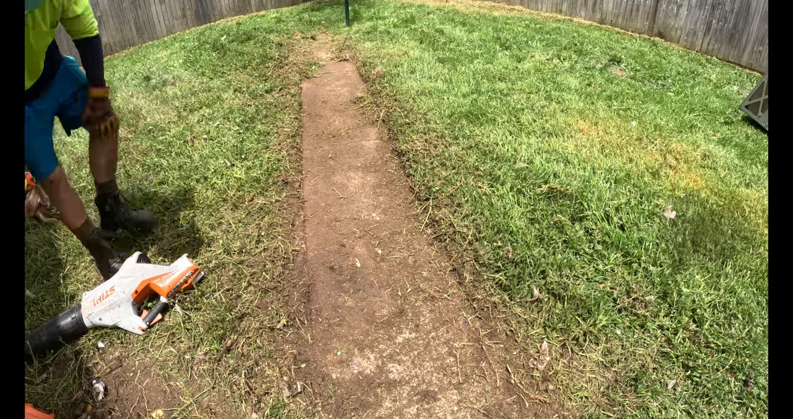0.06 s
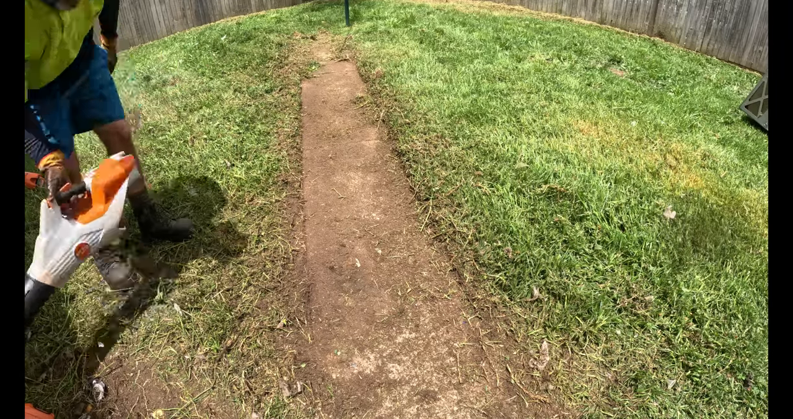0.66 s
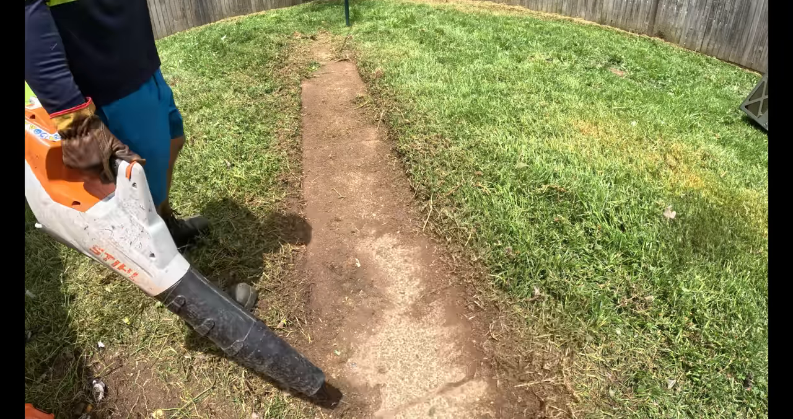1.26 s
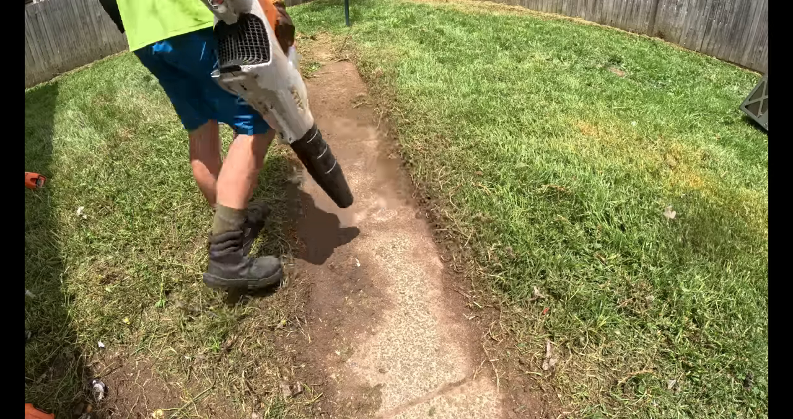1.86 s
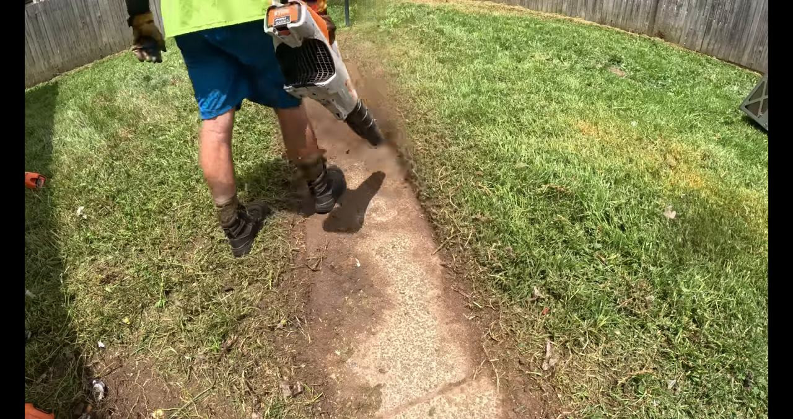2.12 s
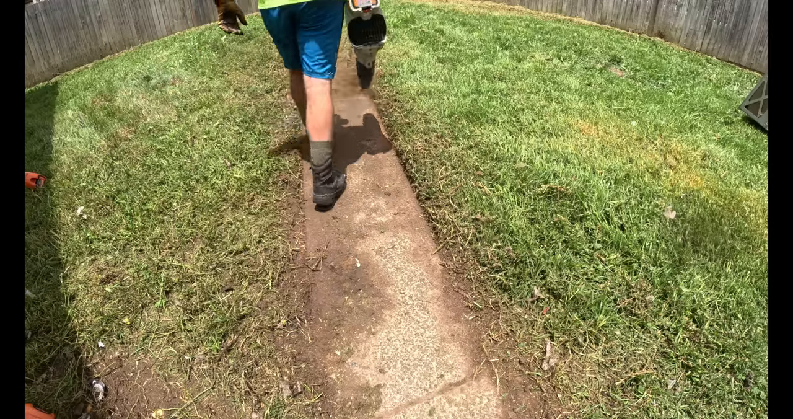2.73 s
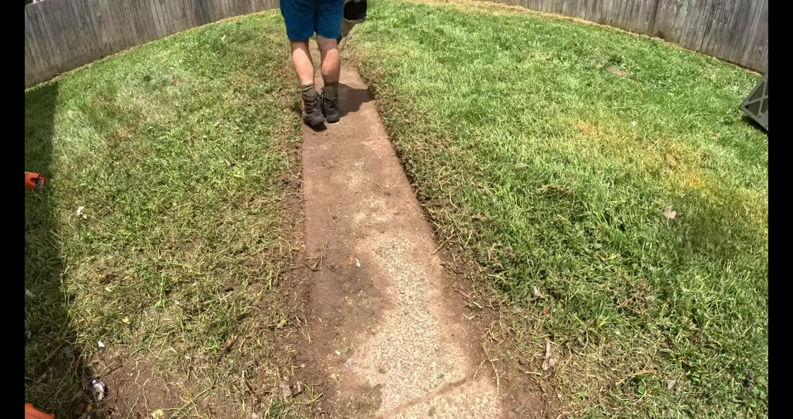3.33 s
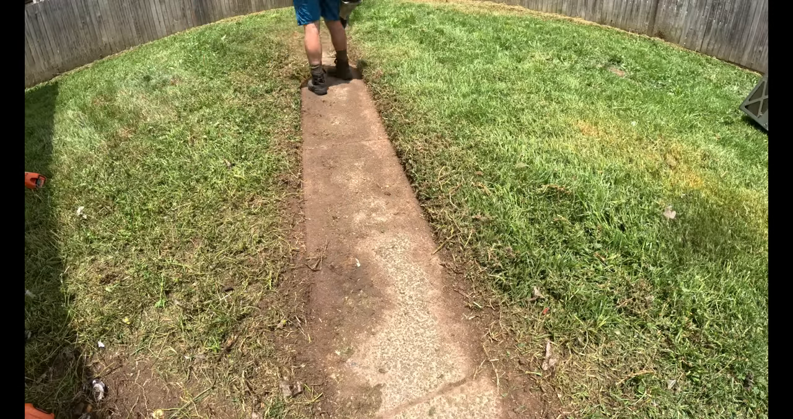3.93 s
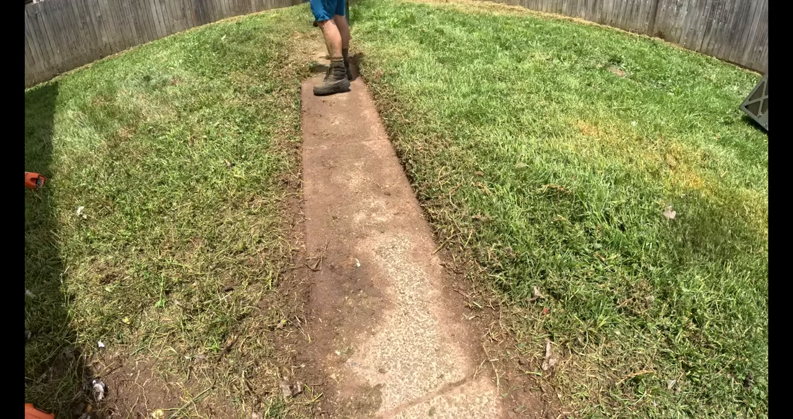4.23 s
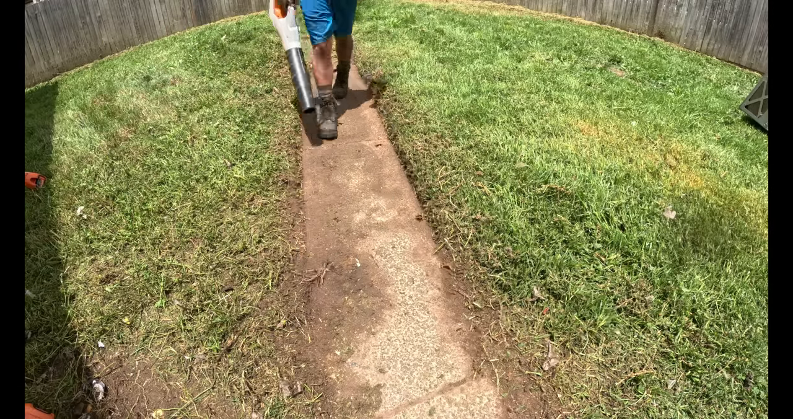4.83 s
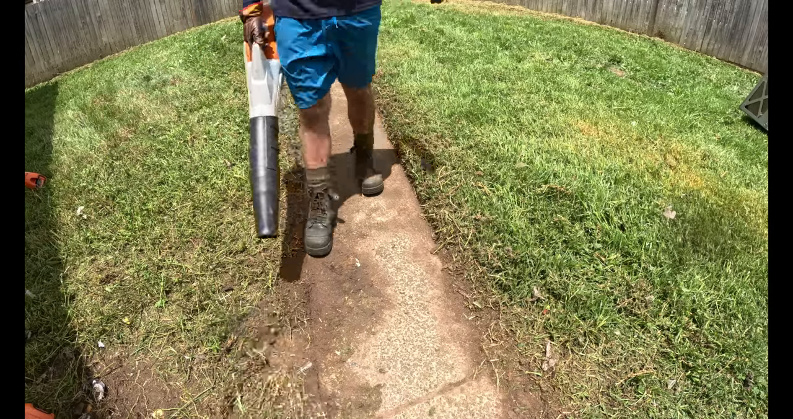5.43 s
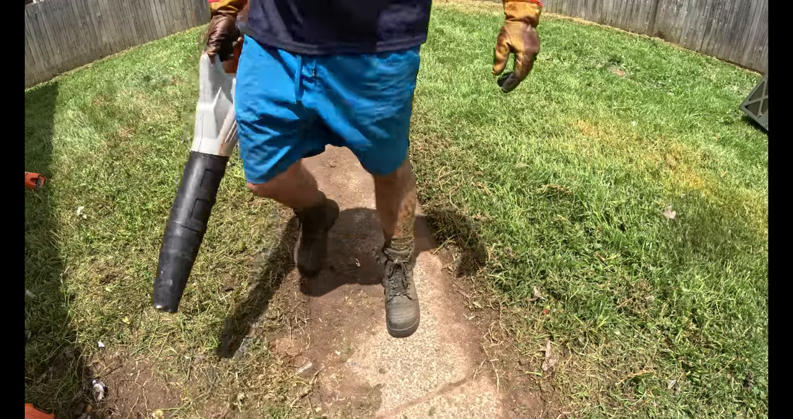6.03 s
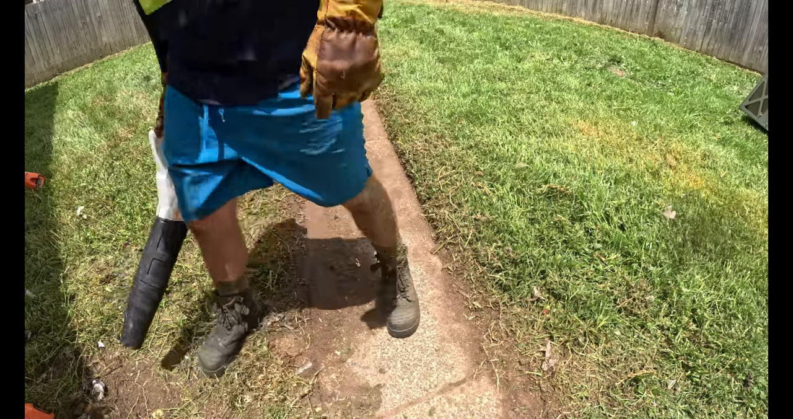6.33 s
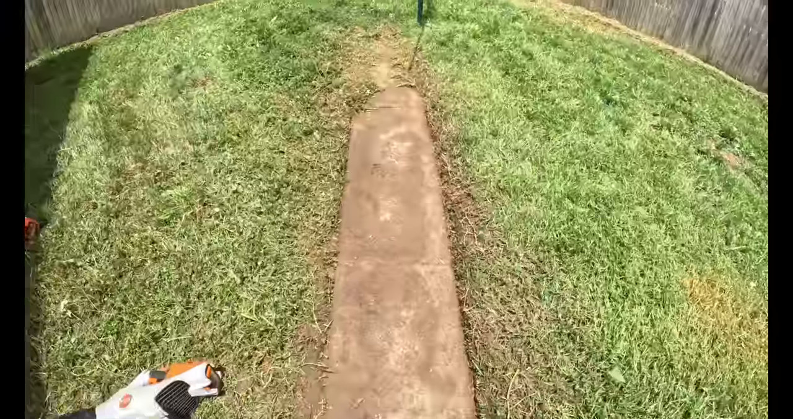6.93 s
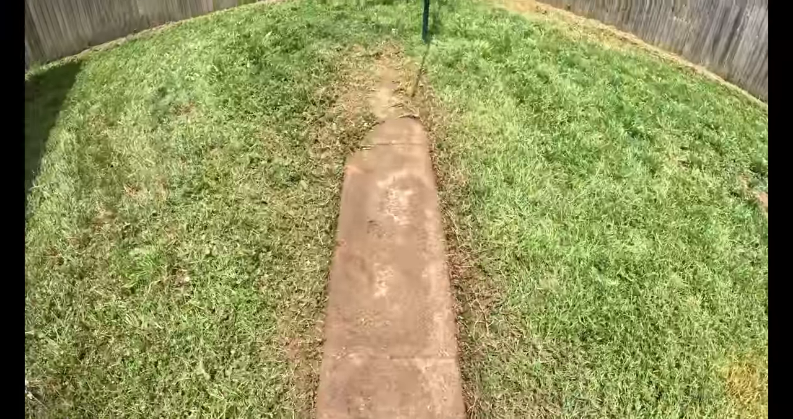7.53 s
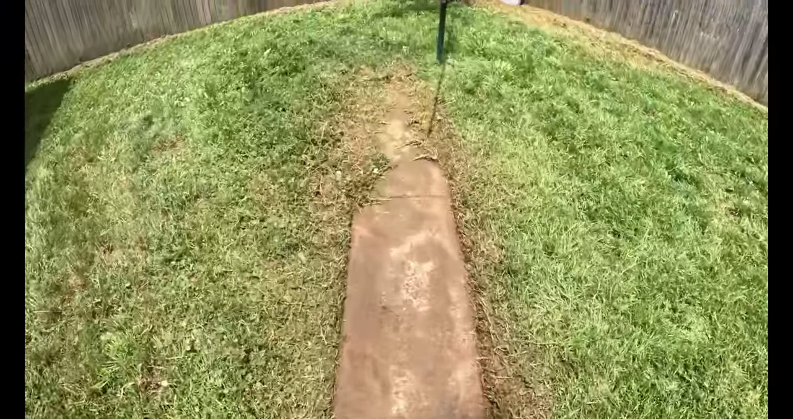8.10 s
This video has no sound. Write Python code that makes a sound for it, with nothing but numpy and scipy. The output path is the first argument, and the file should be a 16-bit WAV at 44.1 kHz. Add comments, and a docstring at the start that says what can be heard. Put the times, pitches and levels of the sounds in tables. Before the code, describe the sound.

A cordless leaf blower runs outdoors in two blasts, a high whine over rushing air, then winds down.

```python
"""Clothes and grass rustle as a cordless leaf blower is picked off a lawn; it is then run in two blasts
along a concrete path and put down. Its twelve-bladed fan whines at the blade-passing frequency over the
rush of a turbulent jet and a hoarse band of tip vortices, with fences reflecting it from all round.
Gusts thump the microphone, and in the quiet afterwards a far bird calls three times."""
import sys
import numpy as np
from scipy import signal
from scipy.io import wavfile
from scipy.ndimage import uniform_filter1d

SR = 44100
rng = np.random.default_rng(int(sys.argv[2]) if len(sys.argv) > 2 else 0)


def file_out(sig):
    """Save sig as 16-bit WAV at sys.argv[1]."""
    # one column per channel
    cols = np.atleast_2d(sig).T
    # limit, then scale
    lim = np.clip(cols, -1, 1)
    pcm = np.round(lim * 32767).astype(np.int16)
    wavfile.write(sys.argv[1], SR, pcm)


N = 359894
TIME = np.arange(N) / SR
SIDES = np.array([[.5], [-.5]])   # splits a difference between left and right

# blasts: (trigger pulled [s], run-up ends [s], speed by then [turns/s], trigger released [s])
BLASTS = [(.92, 1.147, 288, 4.231), (4.412, 4.632, 303.5, 6.366)]
TOP_TURNS_PER_S, SETTLE_S = 326.8, .385
KICK_TURNS_PER_S, KICK_S = 95, .015   # the jolt that starts the fan
BRAKE_S, FRICTION_TURNS_PER_S = .15, 40

# base levels at full speed; each GROWTH is in dB per tenfold speed
WHINE_DB, OCTAVE_DB, WHINE_GROWTH_DB, OCTAVE_GROWTH_DB = -31, -42, 44, 68.5
TOP_DB, HUM_DB, STRUT_DB, HUM_GROWTH_DB = -59, -49, -33, 57
HOWL_DB, HOWL_GROWTH_DB, VORTEX_DB, VORTEX_GROWTH_DB = -31.5, 57, -31, 59
JET_DB, RUSH_GROWTH_DB, ROAR_GROWTH_DB, THROAT_GROWTH_DB = -22, 43.5, 39.5, 29
STALL_WHINE_DB, STALL_JET_DB, STALL_ROAR_DB = -11, -1.5, -1.5   # changes at full stall
HOARSE_DB, WHINE_FLUTTER_DB, VORTEX_SWAY_DB = 4, .6, 1.5

# the whine beams, so it comes and goes as the blower swings: (time [s], level [dB])
WHINE_LOBES = [(0.98, -6), (1.03, 1.5), (1.1, -1), (1.16, -2.0), (1.28, 1.5), (1.34, -0.5), (1.42, 3.5),
               (1.44, -2.0), (1.5, 3.0), (1.54, -2.0), (1.64, 1.5), (1.68, -4.0), (1.72, 4.5), (1.92, 1.5),
               (1.96, -6.5), (2.1, -5.0), (2.2, 1.0), (2.26, -4.0), (2.42, 0.5), (2.48, -6.5), (2.52, -0.5),
               (2.56, -10.0), (2.7, -3.0), (2.82, -3.5), (2.98, 2.5), (3.06, -6.5), (3.22, -1.0),
               (3.24, -8.0), (3.3, -1.5), (3.46, 0.0), (3.5, -3.5), (3.56, 1.5), (3.72, -7.5), (3.78, 0.0),
               (3.9, -4.0), (3.92, 0.0), (3.96, -7.0), (4.12, -2.0), (4.22, -7.5), (4.45, -12), (4.58, -3),
               (4.64, -0.5), (4.7, 4.5), (4.84, -1.5), (4.88, 2.5), (4.96, -3.5), (5.06, 6.0), (5.16, -3.0),
               (5.26, -0.5), (5.32, 4.0), (5.42, -6.0), (5.46, 5.5), (5.5, 7.0), (5.64, 4.5), (5.68, -6.0),
               (5.78, 4.0), (5.82, 0.5), (5.88, 4.0), (5.96, -6.0), (6.0, 0.0), (6.04, -5.0), (6.06, 1.0),
               (6.12, -4.0), (6.24, 2.0), (6.36, -1.0)]
# its side of arrival flips from lobe to lobe: (time [s], left phase lead [rad])
WHINE_PHASE = [(1.1, -2), (1.4, -3), (1.47, -2), (1.53, -2), (1.58, -1.5), (1.96, -6), (2.04, -1),
               (2.24, -1.2), (2.28, -6), (2.62, -1), (2.68, -1.8), (2.8, -1.5), (2.94, -2), (3.2, -1.2),
               (3.45, -2.5), (3.7, -2.5), (3.74, -0.2), (3.95, 1.6), (4.2, 1.5), (4.83, 0.7), (4.98, -1.84),
               (5.4, -2), (5.44, -1.5), (6.1, -1.5), (6.18, -5), (6.35, -1.5)]
# its octave beams in narrower lobes: (time [s], level [dB], left phase lead [rad])
OCTAVE_LOBES = [(1.08, -4, 2.5), (1.3, 8, 1), (1.42, 5, 4), (1.65, -0.5, 3), (1.92, -1.5, 1.5),
                (2.1, -4, 2), (2.33, 1.5, 1.2), (2.6, -4, 1.5), (2.7, -5.5, 4.5), (2.82, -1.5, 6.5),
                (3.1, -4, 4), (3.22, -13, -2.5), (3.32, 5, -2), (3.58, 0, -1.8), (4.2, -2.5, -2),
                (4.6, -6, -1), (4.8, 8, 3), (4.97, -0.5, 1.5), (5.05, 5.5, -6), (5.38, 5, 1),
                (5.51, 0.5, -0.5), (5.6, -2, 3.5), (5.8, -0.5, 2), (6.0, -3.5, -3), (6.35, -2.5, 0.6)]
OCTAVE_PAN_DB = 2.5   # further left than the air
# thin top of the whine: (frequency [multiple of shaft rate], level [dB])
TOP_PARTIALS = [(36, 0), (37.7, -4.5)]
# once-a-turn hum, strongest with the housing side-on and near: (time [s], level [dB])
HUM_LEVELS = [(1.15, 12), (1.4, 14.5), (1.55, 15.5), (1.67, 13.5), (1.76, -7.5), (2.2, 0), (2.45, -11),
              (2.95, -6.5), (3.08, 7), (3.3, -7), (3.75, -8), (5.05, -13.5), (5.24, 10), (5.45, -1.5),
              (5.7, 7), (6.2, -6), (6.35, 9.5)]
# four-a-turn tone of the struts: (time [s], level [dB])
STRUT_LEVELS = [(1.4, -11), (1.51, 5.5), (1.62, -4), (1.77, -3), (1.86, -4), (2.03, 2.5), (2.15, -3.5),
                (2.45, -5), (3.08, -9), (3.19, -3), (3.5, -1.5), (3.6, -9.5), (3.87, -6), (4.0, 0),
                (4.2, -23), (4.6, -16), (5.05, -6.5), (5.2, -10.5), (5.62, -0.5), (5.85, -7), (6.0, -4.5),
                (6.12, -6.5), (6.24, -4.5), (6.36, -12)]

# the strongest tip vortex locks in and lets go again: (time [s], level [dB])
HOWL_LEVELS = [(1.04, -6.0), (1.08, 9.5), (1.11, 13.0), (1.16, 7.5), (1.3, 5.0), (1.36, -8.0), (1.56, 2.0),
               (1.66, -6.0), (1.92, 5.0), (2.0, -10.5), (2.16, 2.0), (2.48, 0.0), (2.6, -13.0), (2.66, 2.0),
               (2.88, 0.5), (2.94, -7.5), (3.02, -1.5), (3.08, -9.0), (3.3, -3.5), (3.48, -13.0),
               (3.58, 2.5), (3.76, -5.5), (3.98, 0.0), (4.12, -6.0), (4.22, 2.5), (4.27, 3.0),
               (4.36, -10.0), (4.58, -5.0), (4.62, -12.0), (4.66, 5.0), (4.86, -8.0), (4.94, -1.5),
               (5.08, -9.0), (5.18, 2.5), (5.28, -5.5), (5.34, 4.5), (5.54, -4.5), (5.68, 2.5),
               (5.86, -10.5), (5.96, -2.0), (6.02, -9.5), (6.14, -3.0), (6.32, -14.5), (6.39, 9.5),
               (6.45, 1.0), (6.52, 11.0), (6.57, 0.0)]
HOWL_MULTIPLE, HOWL_WANDER_HZ, HOWL_FLUTTER_DB = 6.55, 36, 2
# tip vortex bands: (frequency [multiple of shaft rate], width [Hz], level [dB])
VORTEX_BANDS = [(6.4, 340, -3), (7.2, 97, -10), (3.77, 58, -12.5), (3.2, 54, -16.5), (2.58, 25, -23),
                (1.72, 46, -19.5)]
# strength of all these bands together: (time [s], level [dB])
VORTEX_LEVELS = [(1.15, 1), (1.23, 1), (1.53, 1.0), (1.87, 3.0), (1.99, -4.5), (2.19, 2.0), (2.53, 1.0),
                 (2.79, 1.5), (3.19, -1.5), (3.73, -0.5), (4.11, -1.5), (4.23, -4.5), (4.62, 3.0),
                 (4.78, -1.5), (5.0, -1.5), (5.08, -3.5), (5.2, -1.0), (5.5, -2.0), (6.38, -2.0)]
# tube resonances: (frequency [Hz], width [Hz], lift [dB], change of lift at full stall [dB])
TUBE_MODES = [(742, 42, 25, -19), (1700, 170, 0, 7)]

# the jet as the nozzle swings over the ground; roar, throat and hiss are relative to the rush:
# (time [s], rush [dB], low roar [dB], throat [dB], hiss [dB], whole blower's left minus right [dB])
JET_SWING = [(1.15, 1.5, -5, -4, -4.5, 2.8), (1.38, -.5, 3.5, -2, 0.5, 1.8), (1.6, 0.5, -1.5, -1.5, -3, 3),
             (1.8, 1.5, -5.5, -1, -3, 2.6), (1.96, -2, 3, -1.5, -2, 2), (2.35, 2.5, -7, -4, -4.5, 1),
             (2.57, -1.5, 1, -2, -5.5, 1.1), (2.8, 1, -6, -2.5, -4, .5), (3.08, -1, -4, -4, -5.5, 1.3),
             (3.4, -2, 3, 0.5, -3.5, 0.75), (3.75, -2.5, -1, -1, -2, 1.8), (4.2, -2, -1, -1, -4.5, 2.7),
             (4.38, -3, -2, -6.5, -6, 3.1), (4.66, -3.5, -3, -3, 1, 2.2), (5.0, 0, -5, -3, -2, 1.9),
             (5.35, 0, 3.5, -5, 0, 1.7), (5.87, 0, 4.5, -2.5, -0.5, 3.4), (5.97, 2.5, -6, -7, -3.5, 2.2),
             (6.13, -2, 4, -3.5, 1, 4.5), (6.35, 0.5, 1.5, -5.5, -2, 4.2)]
# jet spectrum: (frequency [Hz], relative density [dB])
JET_SPECTRUM = [(40, -24.5), (110, -0.5), (165, -1.5), (225, 0), (320, -2.5), (400, -1.5), (550, -1),
                (670, -5), (950, 1), (1600, 5), (2900, 0), (4100, -3), (4700, -3), (7600, -9), (9500, -17),
                (12400, -16)]
IDLE_TURNS_PER_S, IDLE_DULL_DB = 200, -7   # the treble dulls below this speed, this much at standstill
# carried away and back: (time [s], distance [m], housing reflection [ratio, negative if inverted])
WALK = [(.95, 1.0, .35), (1.5, 1.3, .15), (1.85, 1.47, -.2), (2.3, 1.9, -.25), (3.05, 2.45, -.25),
        (3.35, 3.1, -.15), (4.2, 4.1, 0), (4.6, 5.6, .25), (4.85, 7.1, 0), (5.35, 3.7, 0), (5.6, 3.7, 0),
        (5.92, 2.7, 0), (6.5, 2.6, 0)]
GROUND_LAG_MS_AT_1_M, GROUND_SHARE, HOUSING_LAG_MS, ECHO_TOP_HZ = 5.0, .2, .62, 4000

# a 1042 Hz tone swells while the fan is slow, as it starts and as it slows down: (time [s], level [dB], width
# [s])
SLOW_SPEED_CHIRPS = [(.89, -48.5, 0.0074), (.972, -34.5, 0.015), (1.025, -38, 0.018), (4.322, -45, 0.01),
                     (4.36, -56, 0.031), (4.455, -41, 0.016), (6.472, -39.5, 0.016), (6.52, -56, 0.021)]
# whistle of the drive as it starts and stops: (time [s], level [dB], width [s])
DRIVE_WHISTLES = [(.895, -69, 0.012), (.935, -55, 0.0065), (4.405, -76, 0.017), (6.556, -65, 0.02)]
DRIVE_HZ, SWITCHING_HZ, DRIVE_UNDERTONE_DB = 1042, 8080, -14

# brushing clothes and grass, and at 4.39 s the faint noisy tail of the first blast echoing in the pause:
# (time [s], level [dB], width [s])
RUSTLES_AND_TAIL = [(.02, -61.5, 0.069), (.215, -52.5, 0.037), (.29, -68, 0.049), (.37, -58, 0.039),
                    (.55, -74, 0.013), (.66, -47.5, 0.029), (.81, -56.5, 0.36), (4.39, -63.5, .05),
                    (6.635, -53, 0.029), (6.68, -65, 0.11), (7.06, -90, 0.04), (8.05, -67.5, 0.023),
                    (8.11, -54, 0.018)]
# their spectrum: (frequency [Hz], relative density [dB])
RUSTLE_SPECTRUM = [(60, -10), (150, -2), (250, -2.5), (450, -11), (600, -9), (850, -14.5), (1500, -7),
                   (3500, -15.5), (7000, -22), (8800, -34.5), (12500, -34)]
# scuffs, knocks, the motor's starting jolt, and at 6.895 s a faint click as the sound returns after
# the dropout: (time [s], level [dB], centre [Hz], decay [s])
TRANSIENTS = [(.133, -56.5, 2400, .02), (.208, -55, 1990, .012), (.25, -53.5, 5470, 0.048),
              (.338, -56, 5500, .018), (.652, -55, 2270, 0.0078), (.923, -51, 1880, 0.009),
              (.957, -34.5, 890, 0.13), (4.437, -48, 680, 0.017), (6.472, -36.5, 1965, 0.011),
              (6.895, -68.5, 788, 0.008), (7.159, -60.5, 1090, .0075), (7.461, -60, 600, 0.006),
              (7.483, -65, 2200, 0.0037), (7.496, -67, 2180, .004), (7.525, -66, 1000, .007),
              (7.579, -73, 2600, .007), (7.822, -70, 500, 0.0046), (7.863, -66, 450, .007),
              (7.963, -68, 600, .006), (8.01, -65, 2500, 0.008), (8.02, -64.5, 650, 0.18),
              (8.113, -48.5, 3550, 0.0055)]
# gusts and bumps on the microphone: (time [s], level [dB], centre [Hz], width [s])
THUMPS = [(.31, -41, 44.4, 0.0087), (.378, -45, 147, 0.0017), (1.14, -35, 50.7, 0.01),
          (1.3, -41, 49.6, 0.026), (1.5, -32.5, 52.7, 0.0047), (1.74, -40, 45, 0.015),
          (1.91, -44, 44.7, 0.021), (3.575, -24, 200.4, 0.01), (3.79, -40, 50, 0.017),
          (4.37, -46, 45, 0.019), (4.472, -38, 197, 0.0071), (4.502, -37, 207, 0.0127),
          (4.59, -34, 64.4, 0.0054), (6.26, -38, 176, 0.13), (7.17, -52.5, 169.3, 0.0078),
          (7.466, -43.5, 134, 0.0024), (7.535, -56.5, 165, 0.0054), (7.8, -55, 59.4, 0.057),
          (7.972, -38, 101, 0.0056)]
# breeze on the microphone, in its lulls: (time [s], level [dB])
BREEZE_LULLS = [(0.0, -64), (0.36, -69), (1.07, -65), (1.34, -56), (2.66, -72), (3.34, -65), (3.54, -54),
                (3.93, -53), (4.14, -63.5), (4.95, -63.5), (5.27, -53.5), (6.23, -51.5), (6.7, -71.5),
                (6.91, -65), (7.07, -66), (8.02, -58.5), (8.16, -55)]
BREEZE_LIFT_DB = 7.5   # its mean level above the lulls
# breeze spectrum: (frequency [Hz], relative density [dB])
BREEZE_SPECTRUM = [(25, 10.5), (55, 7), (110, -7), (230, -14.5), (400, -25.5), (1000, -41), (4000, -52)]

# far bird calls: (start [s], length [s], top pitch [Hz], level [dB])
BIRD_CALLS = [(6.95, .27, 1352, -76), (7.33, .3, 1372, -76), (7.62, .32, 1400, -71)]
# harmonics of a call: (harmonic [number], level [dB])
BIRD_HARMONICS = [(1, -7.5), (2, -7.5), (3, -8), (4, -17)]
BIRD_RASP = .013   # share by which the pitch trembles
# faint outdoor air: (frequency [Hz], relative density [dB])
AIR_SPECTRUM = [(100, 1), (600, -2.5), (900, -12), (1400, -5.5), (2500, -14.5), (5000, -17.5),
                (7500, -36.5), (13000, -48.5)]
AIR_DB = -76.5
DROPOUT_FROM_S, DROPOUT_TO_S, ROLL_OFF_HZ, CUTOFF_HZ = 6.7, 6.892, 13200, 15300


def fan(turns, speed):
    """Periodic forcing: twelve blades give the whine and overtones; imbalance and struts, lower tones."""
    effort, stall = decades(speed), stalled(speed)
    passes = 12 * turns
    whine_db = WHINE_DB + in_time(WHINE_LOBES)[0] + WHINE_GROWTH_DB * effort + STALL_WHINE_DB * stall
    whine_db += WHINE_FLUTTER_DB * drift(19)
    hoarse = from_db(HOARSE_DB) * stall * tone(passes, scatter=5, fade_hz=170)
    clear = tone(passes, scatter=.2, fade_hz=22, lead=in_time(WHINE_PHASE)[0])
    whine = from_db(whine_db) * (clear + hoarse)
    octave_db, octave_lead = in_time(OCTAVE_LOBES)
    octave_gain = from_db(OCTAVE_DB + octave_db + OCTAVE_PAN_DB * SIDES)
    overtones = octave_gain * tone(2 * passes, scatter=.38, fade_hz=28, lead=octave_lead)
    for multiple, db in TOP_PARTIALS:
        overtones += from_db(TOP_DB + db) * tone(multiple * turns, scatter=1.4, fade_hz=50)
    hum = from_db(HUM_DB + in_time(HUM_LEVELS)[0]) * tone(turns, scatter=.5, fade_hz=12, lead=1.0)
    strut_gain = from_db(STRUT_DB + in_time(STRUT_LEVELS)[0])
    struts = strut_gain * tone(4 * turns, scatter=.55, fade_hz=7.8, lead=2.1)
    low_tones = from_db(HUM_GROWTH_DB * effort) * (hum + struts)
    return whine + from_db(OCTAVE_GROWTH_DB * effort) * overtones + low_tones


def shaft_speed():
    """Rotor inertia, in turns/s: a kick, a steady run-up, a creep to top speed, braking on release."""
    speed = np.zeros(N)
    for pulled, run_up_ends, reached, released in BLASTS:
        since = np.maximum(TIME - pulled, 0)
        kick = KICK_TURNS_PER_S * (1 - np.exp(-since / KICK_S))
        run_up = kick + (reached - KICK_TURNS_PER_S) * since / (run_up_ends - pulled)
        settling = np.exp(-np.maximum(TIME - run_up_ends, 0) / SETTLE_S)
        creep = TOP_TURNS_PER_S - (TOP_TURNS_PER_S - reached) * settling
        driven = np.where(TIME < run_up_ends, run_up, creep)
        brake = np.exp(-np.maximum(TIME - released, 0) / BRAKE_S)
        speed = np.maximum(speed, (driven + FRICTION_TURNS_PER_S) * brake - FRICTION_TURNS_PER_S)
    return speed


def turns_made(speed):
    """Phase is the integral of speed; while the blades stall, their pitch breaks up."""
    break_up = .06 * stalled(speed) * drift(250)
    return np.cumsum(speed * (1 + .0005 * drift(5.8) + break_up)) / SR


def stalled(speed):
    """Blade stall: 0 at steady speed, 1 under the hardest braking, a little in a fast run-up."""
    acceleration = np.gradient(speed) * SR
    stall = np.maximum(-acceleration / 1500, (acceleration - 200) / 2500)
    return uniform_filter1d(np.clip(stall, 0, 1), size=900)


def decades(speed):
    """Speed in powers of ten, 0 at the top: by a power law, flow noise in dB grows in proportion."""
    return np.log10(np.maximum(speed / TOP_TURNS_PER_S, 1e-3))


def howl(turns, speed):
    """Lock-in: one tip vortex sings with the shaft, clear on the way up, wavering near top speed."""
    unrest = (speed / TOP_TURNS_PER_S) ** 8
    cycles = HOWL_MULTIPLE * turns + np.cumsum(unrest * HOWL_WANDER_HZ * drift(16)) / SR
    flutter_db = unrest * HOWL_FLUTTER_DB * (drift(28) - .5)
    gain = from_db(HOWL_DB + in_time(HOWL_LEVELS)[0] + HOWL_GROWTH_DB * decades(speed) + flutter_db)
    lead = -1.4 + 1.1 * unrest * drift(3)
    return gain * tone(cycles, scatter=.3 + .45 * unrest, fade_hz=45, lead=lead)


def vortices(turns, speed):
    """Uneven vortex shedding: hoarse bands follow the shaft speed and flare in the tube's resonances."""
    bands, stall = 0, stalled(speed)
    for multiple, width_hz, db in VORTEX_BANDS:
        unsteady = stereo_drift(width_hz * .44) + 1j * stereo_drift(width_hz * .61)
        unsteady /= (np.abs(unsteady) + .039) ** .13   # strength saturates, timing stays loose
        shedding = np.real(unsteady * np.exp(2j * np.pi * multiple * turns))
        tube_db = sum((lift_db + stall_db * stall) / (1 + ((multiple * speed - hz) / width) ** 2)
                      for hz, width, lift_db, stall_db in TUBE_MODES)
        bands += from_db(db + tube_db + VORTEX_SWAY_DB * drift(13)) * shedding
    return bands * from_db(VORTEX_DB + in_time(VORTEX_LEVELS)[0] + VORTEX_GROWTH_DB * decades(speed))


def jet(speed, rush_db, roar_db, throat_db, hiss_db):
    """Turbulence: broadband noise, louder and brighter with speed, its colour shifting with the swing."""
    rush, effort, stall = 0, decades(speed), stalled(speed)
    roar_db = roar_db + STALL_ROAR_DB * stall   # the low roar collapses first
    for hz, noise in noise_bands(JET_SPECTRUM):
        low = np.interp(np.log(hz), np.log([330, 800]), [1, 0])
        middle = np.interp(np.log(hz), np.log([410, 790, 1280, 2500]), [0, 1, 1, 0])
        high = np.interp(np.log(hz), np.log([3200, 5200]), [0, 1])
        rest = 1 - low - middle
        growth_db = low * ROAR_GROWTH_DB + middle * THROAT_GROWTH_DB + rest * RUSH_GROWTH_DB
        swing_db = rush_db + low * roar_db + middle * throat_db + high * hiss_db
        dull_db = IDLE_DULL_DB * np.maximum(1 - speed / IDLE_TURNS_PER_S, 0) * rest
        eddies_db = (2.11 + 2.33 * low + 2.3 * middle) * drift(11.9)
        rush += noise * from_db(JET_DB + growth_db * effort + swing_db + dull_db + eddies_db)
    return rush * from_db(STALL_JET_DB * stall)


def reflected(direct):
    """Comb filtering: ground and housing add short dull echoes, and the comb sweeps with distance."""
    def delayed(ms):
        return np.array([np.interp(TIME - ms / 1000, TIME, side) for side in direct])

    distance_m, housing_share = in_time(WALK)
    ground = GROUND_SHARE * delayed(GROUND_LAG_MS_AT_1_M / distance_m)
    housing = housing_share * delayed(HOUSING_LAG_MS)
    return direct + low_pass(ground + housing, ECHO_TOP_HZ, order=1)


def drive():
    """Fixed pitches: a 1042 Hz tone with its undertone swells while the fan is slow, and the drive whistles as
    it starts and stops."""
    chirp = tone(DRIVE_HZ * TIME, scatter=.48, fade_hz=45)
    undertone = from_db(DRIVE_UNDERTONE_DB) * tone(DRIVE_HZ / 2 * TIME, scatter=.306, fade_hz=44.8)
    whistle = tone(SWITCHING_HZ * TIME, scatter=1.5, fade_hz=109)
    return swells(SLOW_SPEED_CHIRPS) * (chirp + undertone) + swells(DRIVE_WHISTLES) * whistle


def rustle_and_tail():
    """Friction: tiny slips of cloth and grass hiss; one swell of that noise is the first blast's tail."""
    grain = rms_one(from_db(.44 * drift(140)))
    return swells(RUSTLES_AND_TAIL) * grain * patchy_noise(RUSTLE_SPECTRUM, patchy_db=3.5, rate_hz=21)


def transients():
    """Damped transients: each scuff, knock, jolt or click is noise that starts suddenly and dies away."""
    return low_pass(puffs(TRANSIENTS, knock, spread=1.85, shared=.78), hz=7040, order=4)


def wind():
    """Pressure fluctuations at the microphone: a rumbling breeze, and the thumps of gusts and bumps."""
    rumble = patchy_noise(BREEZE_SPECTRUM, patchy_db=6.5, rate_hz=5.4)
    breeze = from_db(in_time(BREEZE_LULLS)[0] + BREEZE_LIFT_DB) * rumble
    return breeze + puffs(THUMPS, swell, spread=1.29, shared=1.0)


def bird():
    """A harmonic series with strong overtones gives nasal calls, each a shallow arch in pitch."""
    pitch, gain = np.zeros(N), np.zeros(N)
    for start, length, hz, db in BIRD_CALLS:
        along = (TIME - start) / length
        arch = np.sin(np.pi * np.clip(along, 0, 1))
        pitch = np.where(along > 0, hz * (.94 + .06 * arch), pitch)
        gain += from_db(db) * arch ** 2
    cycles = np.cumsum(pitch * (1 + BIRD_RASP * drift(58))) / SR
    return gain * sum(from_db(db) * tone(k * cycles, scatter=1.56, fade_hz=35)
                      for k, db in BIRD_HARMONICS)


def outdoor_air():
    """Ambient noise floor: faint, steady and strongest in the bass."""
    return from_db(AIR_DB) * rms_one(sum(noise for hz, noise in noise_bands(AIR_SPECTRUM)))


def tone(cycles, scatter, fade_hz, lead=.82):
    """Interference of a direct tone, its left side ahead by lead radians, with shifting echoes; rms 1."""
    direct = np.exp(1j * (lead * SIDES + .15 * stereo_drift(1.5)))
    echoes = scatter * (stereo_drift(fade_hz) + 1j * stereo_drift(fade_hz)) / np.sqrt(2)
    return rms_one(np.real((direct + echoes) * np.exp(2j * np.pi * cycles)))


def puffs(rows, envelope, spread, shared):
    """Partial coherence: bursts of band noise, partly alike on the two sides."""
    white = rng.standard_normal((2, N)) + shared * rng.standard_normal(N)
    return sum(from_db(db) * envelope(s, length) * rms_one(band(white, hz / spread, hz * spread))
               for s, db, hz, length in rows)


def patchy_noise(spectrum, patchy_db, rate_hz):
    """Random amplitude modulation: coloured stereo noise whose bands flicker; rms 1."""
    return rms_one(sum(noise * from_db(patchy_db * drift(rate_hz)) for hz, noise in noise_bands(spectrum)))


def noise_bands(spectrum):
    """Spectral shaping: yields (centre [Hz], stereo noise) in near third octaves, wider in the bass."""
    hz, db = np.transpose(spectrum)
    edges = np.r_[22, 45, 80, np.geomspace(125, 13000, 23)]
    white = rng.standard_normal((2, 2, N))
    for k, (low, high) in enumerate(zip(edges, edges[1:])):
        centre = np.sqrt(low * high)
        gain = from_db(np.interp(np.log(centre), np.log(hz), db))
        yield centre, gain * band(white[k % 2], low, high)


def drift(rate_hz):
    """Low-passed Gaussian noise: a smooth random curve of spread 1."""
    pole = np.exp(-32 * np.pi * rate_hz / SR)
    white = rng.standard_normal(N // 16 + 4002)
    slow = signal.lfilter([1], [1, -2 * pole, pole * pole], white)[4000:]
    return np.interp(np.arange(N) / 16, np.arange(len(slow)), rms_one(slow))


def stereo_drift(rate_hz):
    """Uncorrelated drift on the two sides."""
    return np.array([drift(rate_hz), drift(rate_hz)])


def swell(s, width):
    """Gaussian envelope of height 1."""
    return np.exp(-.5 * np.minimum(((TIME - s) / width) ** 2, 100))


def swells(rows):
    """Superposed swells from rows of (time [s], level [dB], width [s])."""
    return sum(from_db(db) * swell(s, width) for s, db, width in rows)


def knock(s, decay):
    """Exponential decay from a sudden start."""
    return (TIME >= s) * np.exp(-np.clip((TIME - s) / decay, 0, 40))


def band(x, low, high):
    """Band-pass filter, edges in Hz."""
    sections = signal.butter(2, [low, min(high, .45 * SR)], "band", fs=SR, output="sos")
    return signal.sosfilt(sections, x)


def low_pass(x, hz, order):
    """Low-pass filter."""
    return signal.sosfilt(signal.butter(order, hz, fs=SR, output="sos"), x)


def in_time(rows):
    """Linear interpolation of each column at every sample."""
    times, *columns = np.transpose(rows)
    return [np.interp(TIME, times, column) for column in columns]


def from_db(db):
    """Decibels to gain."""
    return 10 ** (np.asarray(db) / 20)


def rms_one(x):
    """Scale to rms 1."""
    return x / np.sqrt(np.mean(x ** 2) + 1e-20)


def scene():
    """Superposition: the blower, a little to the left, with wind, handling and bird around it."""
    speed = shaft_speed()
    turns = turns_made(speed)
    rush_db, roar_db, throat_db, hiss_db, pan_db = in_time(JET_SWING)
    airflow = vortices(turns, speed) + jet(speed, rush_db, roar_db, throat_db, hiss_db)
    blower = fan(turns, speed) + howl(turns, speed) + reflected(airflow) + drive()
    around = wind() + transients() + rustle_and_tail() + bird() + outdoor_air()
    return blower * from_db(pan_db * SIDES) + around


def record(dry):
    """Gating and band limiting: the sound drops out briefly; the top octave rolls off and is cut."""
    silent = (TIME > DROPOUT_FROM_S) & (TIME < DROPOUT_TO_S)
    gate = 1 - uniform_filter1d(silent.astype(float), size=150)
    soft = low_pass(dry * gate + 1e-9, ROLL_OFF_HZ, order=6)
    return signal.sosfilt(signal.ellip(10, .1, 80, CUTOFF_HZ, fs=SR, output="sos"), soft)


dry = scene()
out = record(dry)
file_out(out)
```